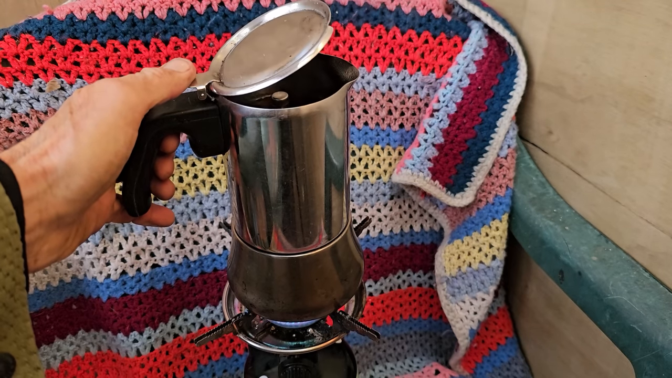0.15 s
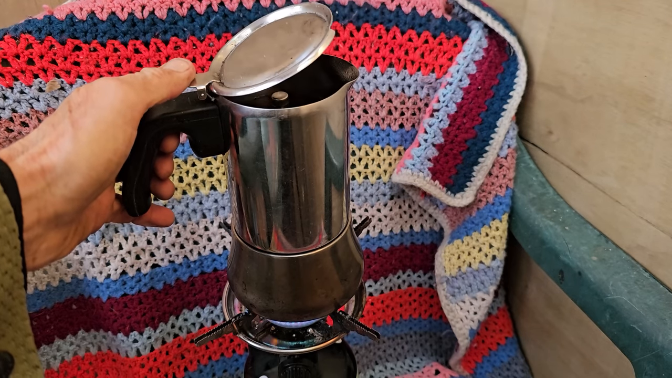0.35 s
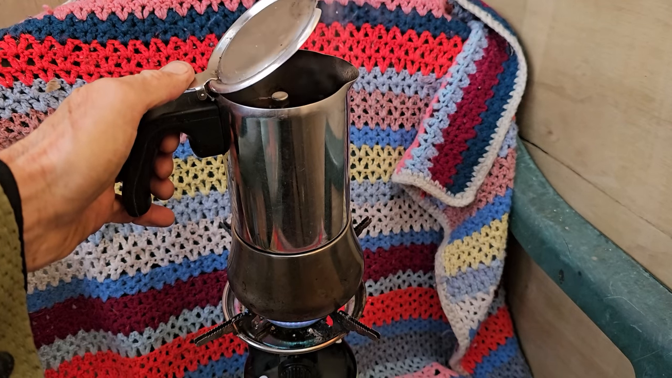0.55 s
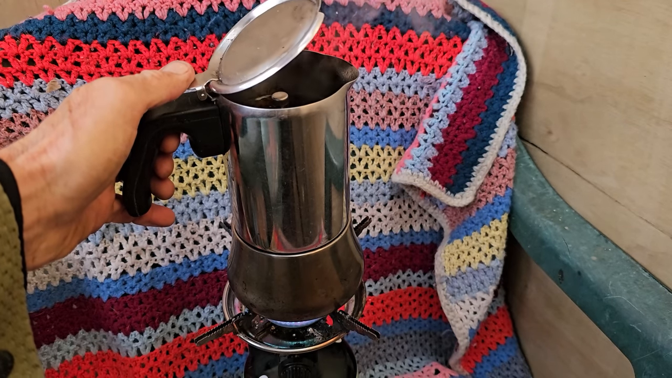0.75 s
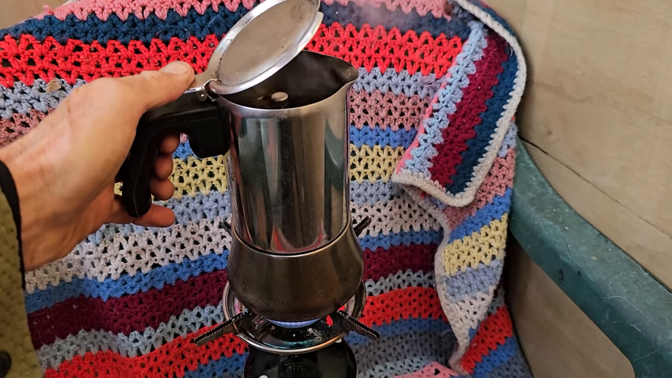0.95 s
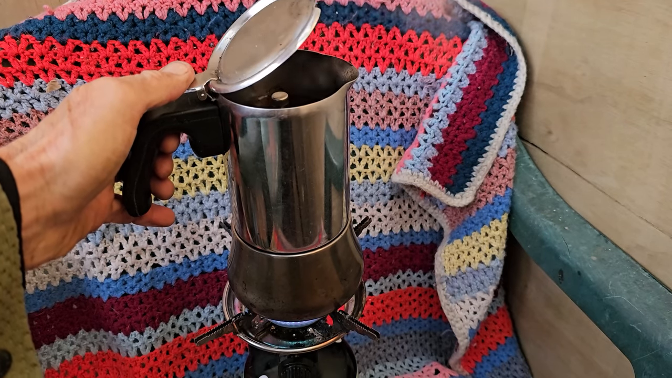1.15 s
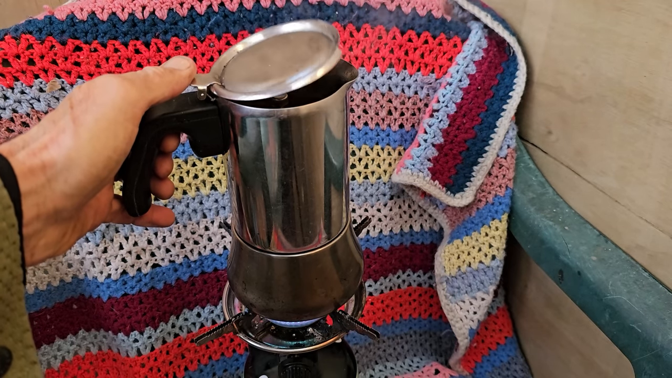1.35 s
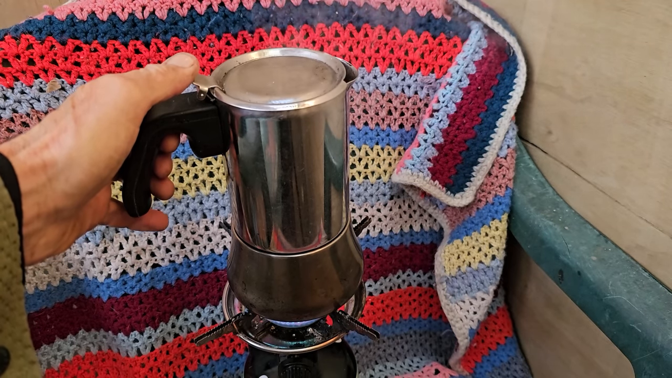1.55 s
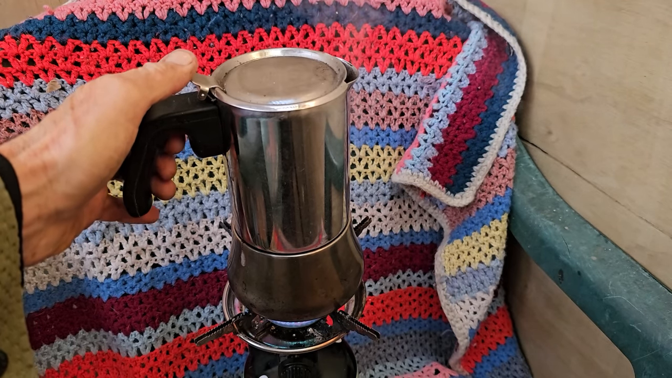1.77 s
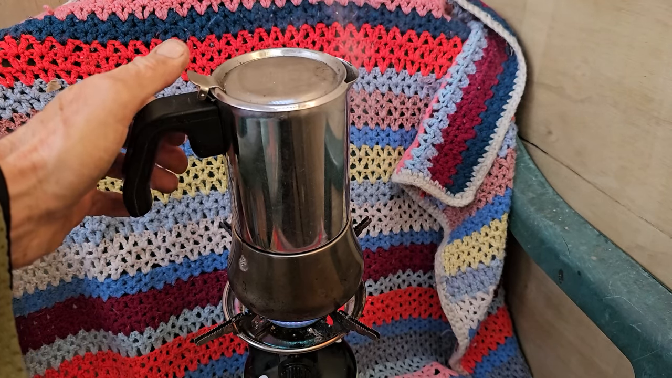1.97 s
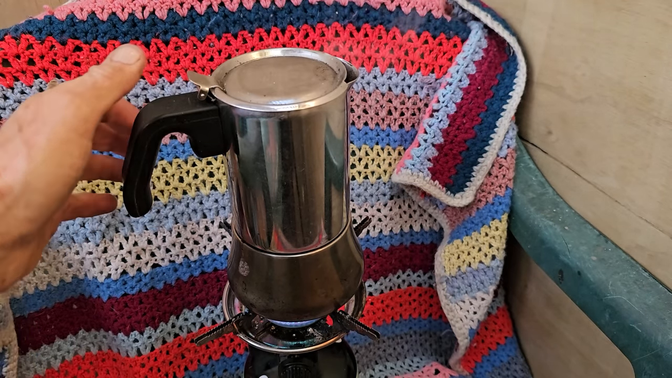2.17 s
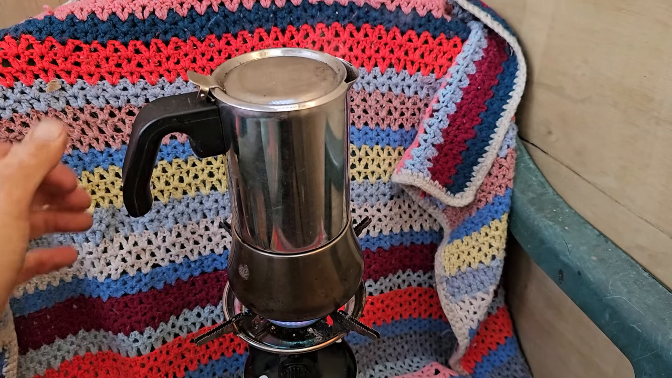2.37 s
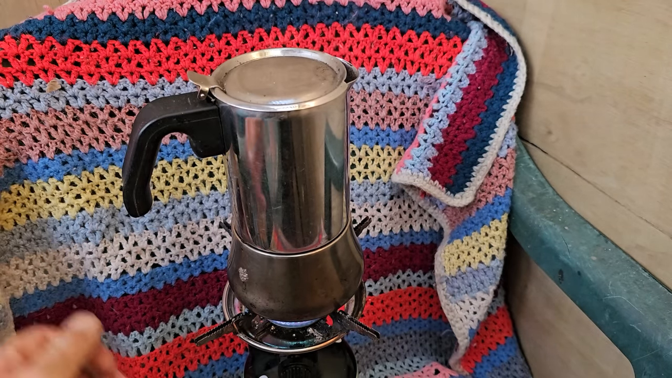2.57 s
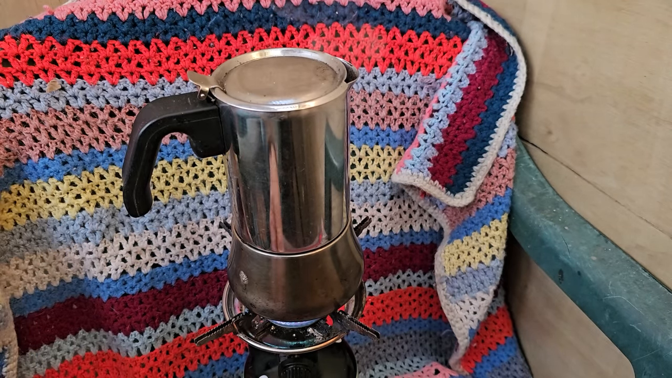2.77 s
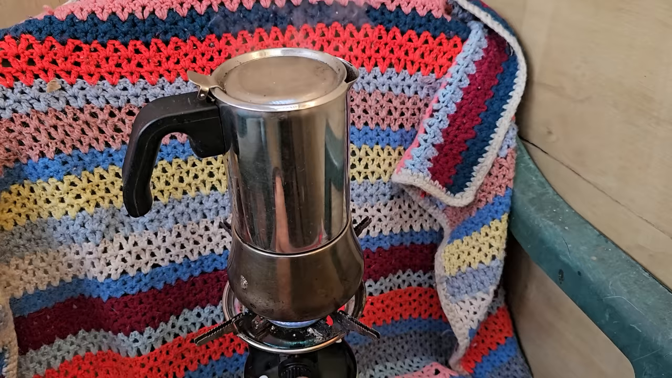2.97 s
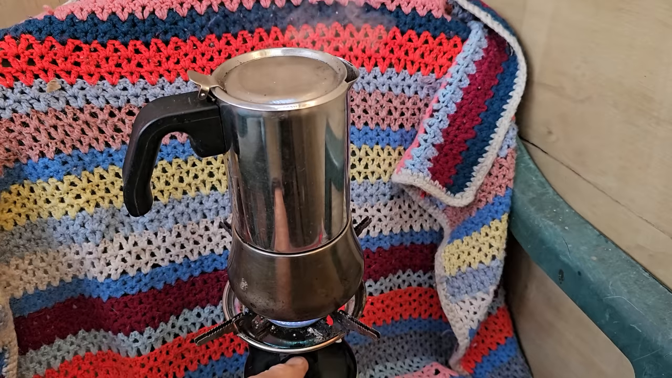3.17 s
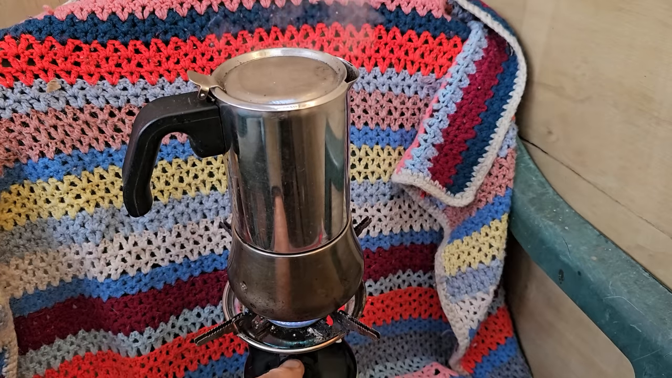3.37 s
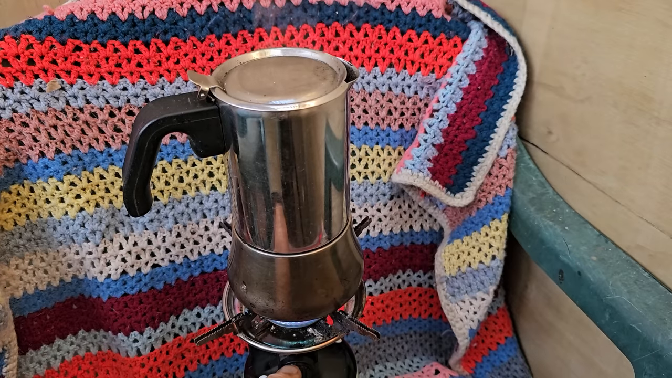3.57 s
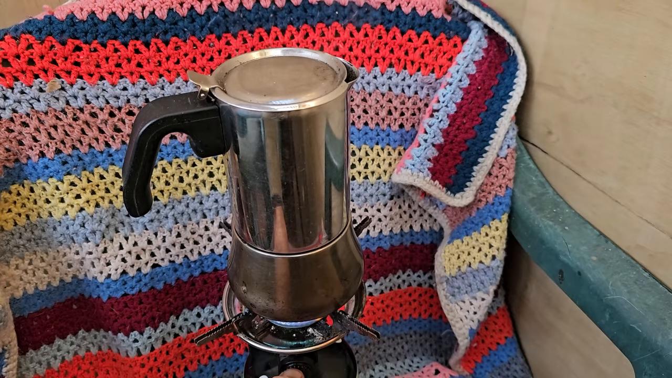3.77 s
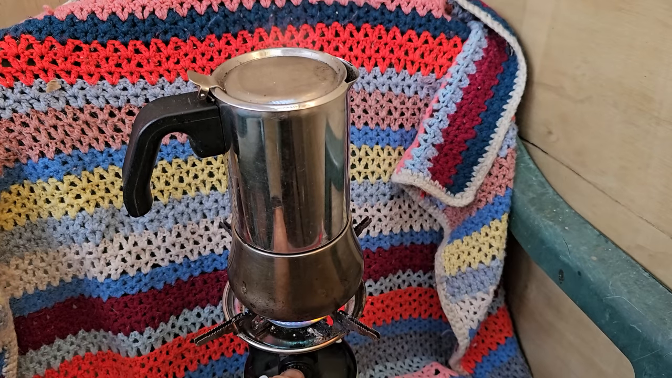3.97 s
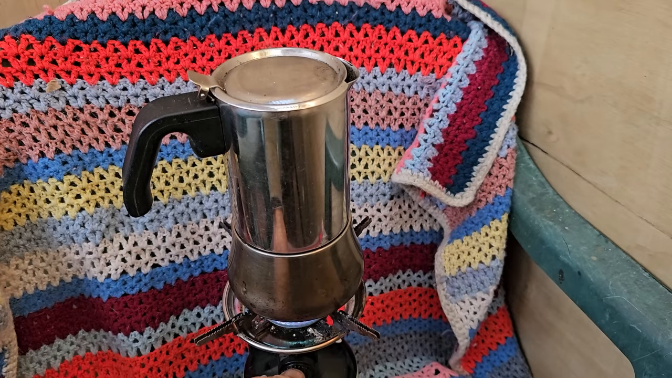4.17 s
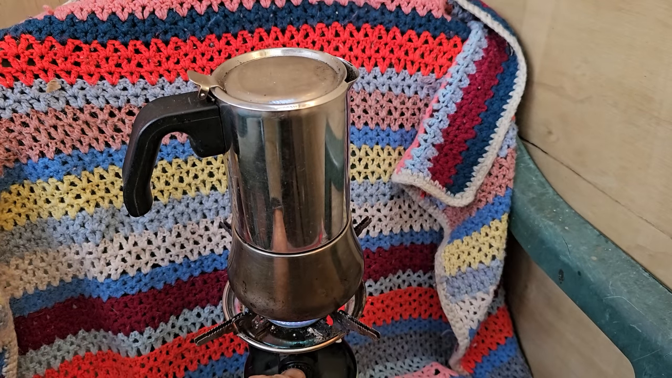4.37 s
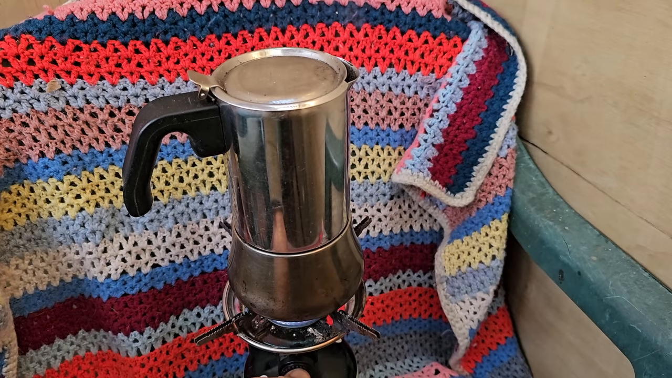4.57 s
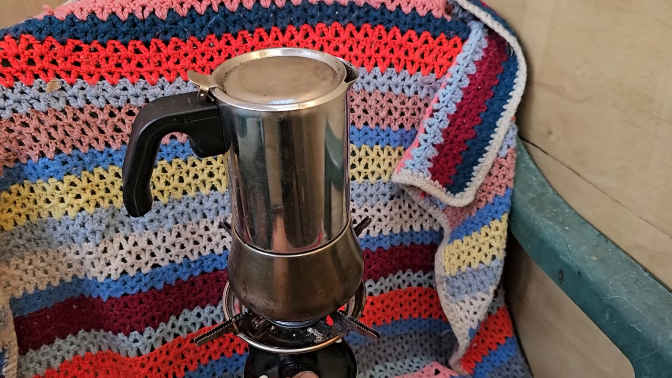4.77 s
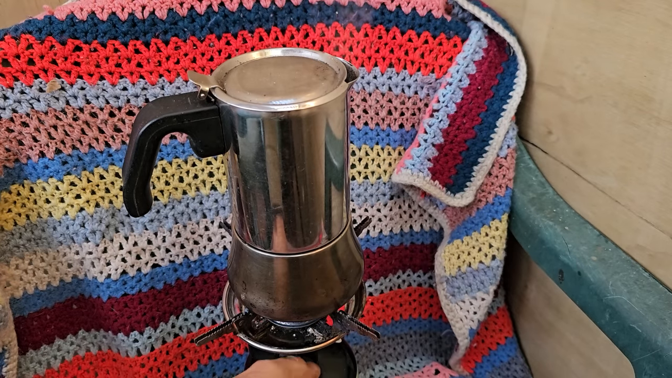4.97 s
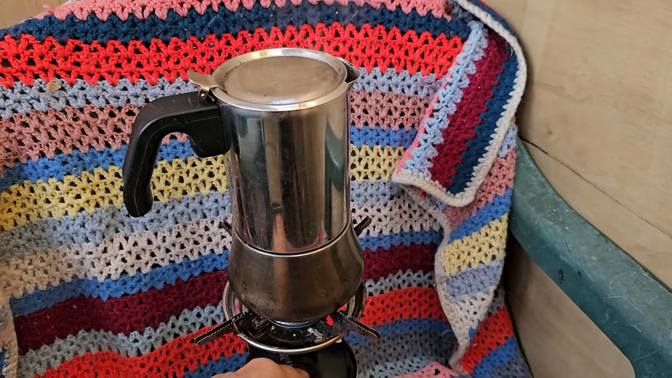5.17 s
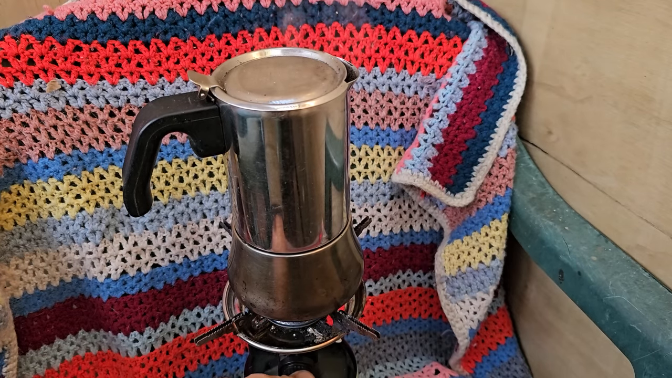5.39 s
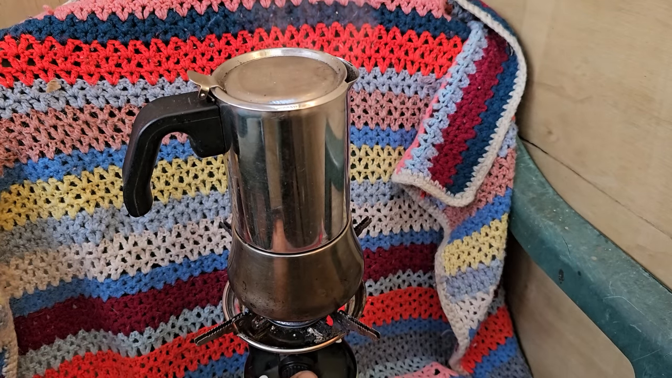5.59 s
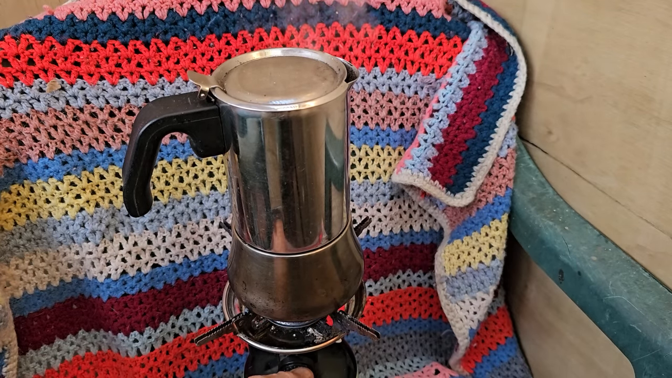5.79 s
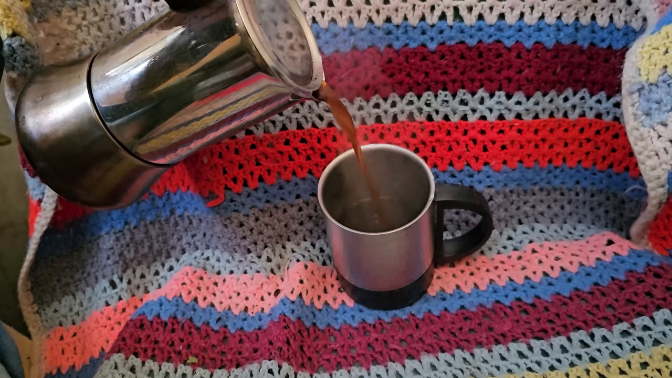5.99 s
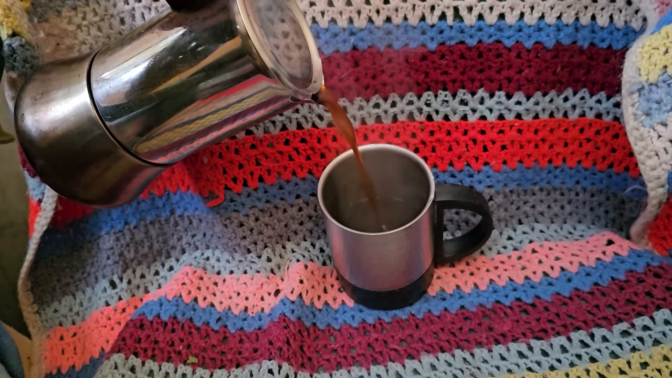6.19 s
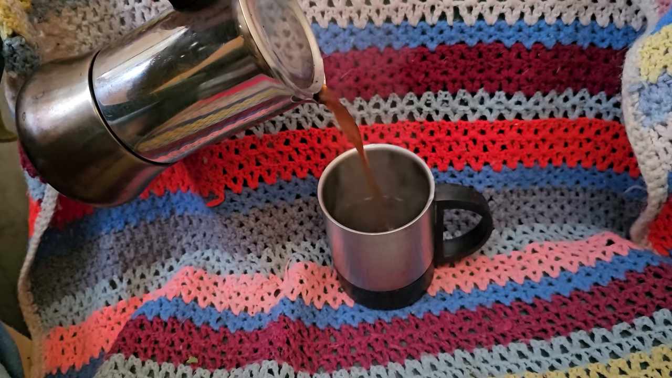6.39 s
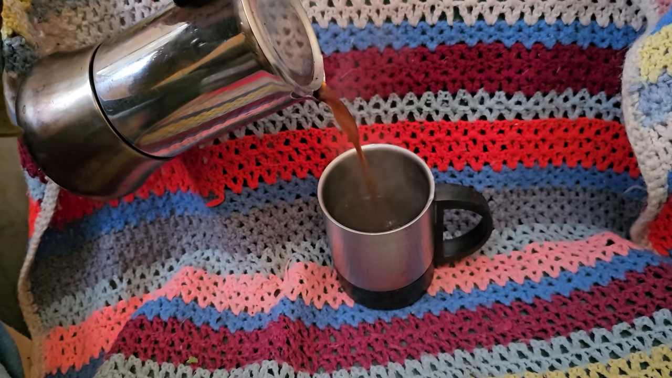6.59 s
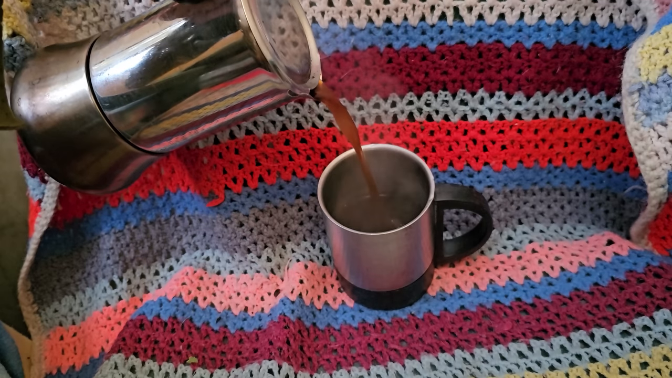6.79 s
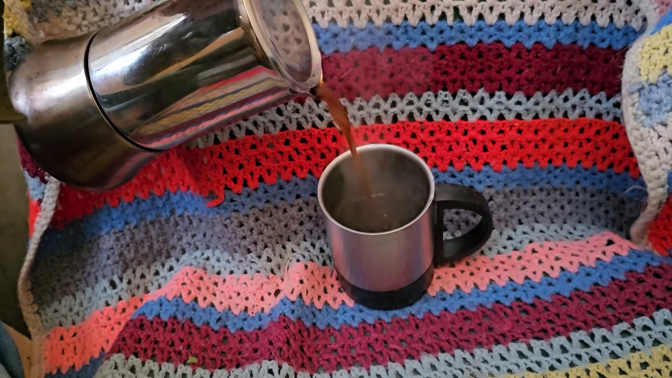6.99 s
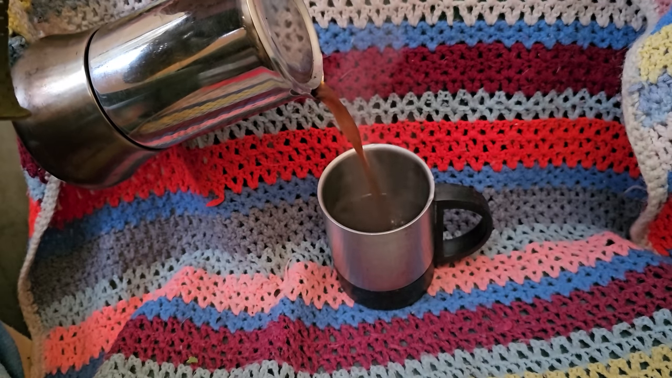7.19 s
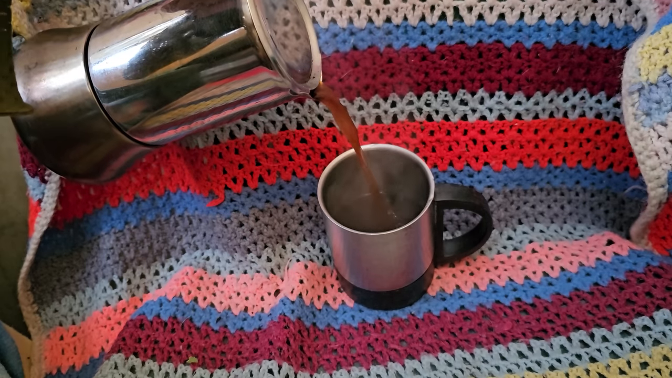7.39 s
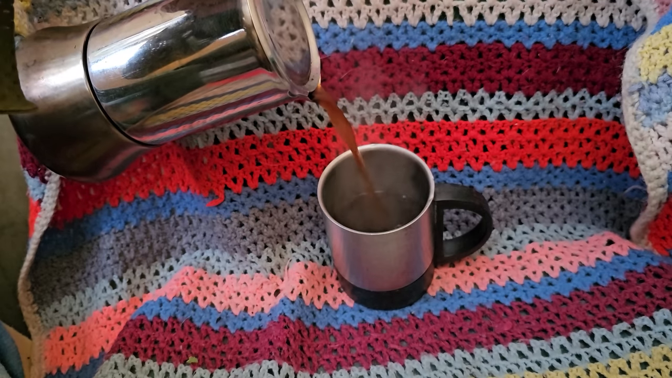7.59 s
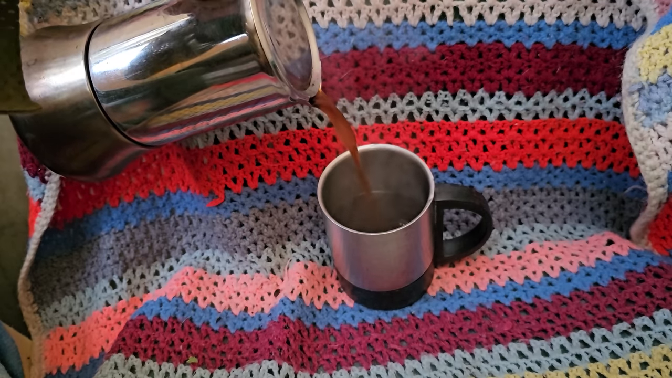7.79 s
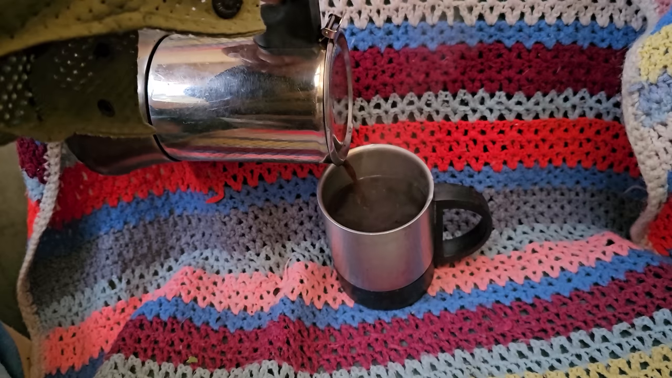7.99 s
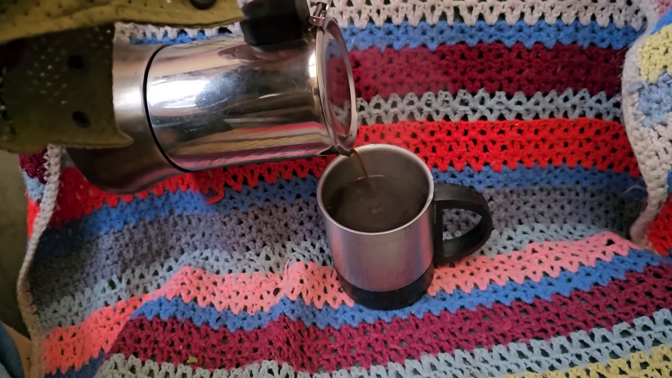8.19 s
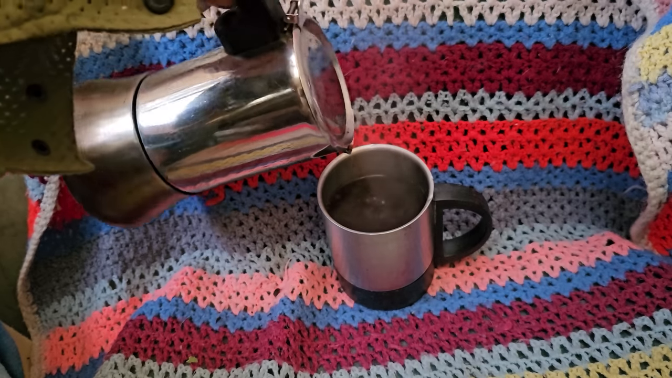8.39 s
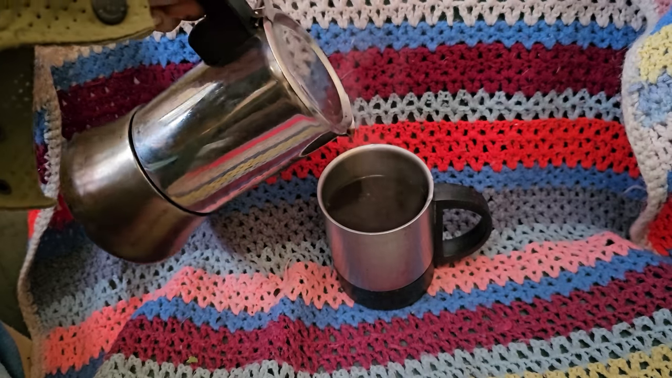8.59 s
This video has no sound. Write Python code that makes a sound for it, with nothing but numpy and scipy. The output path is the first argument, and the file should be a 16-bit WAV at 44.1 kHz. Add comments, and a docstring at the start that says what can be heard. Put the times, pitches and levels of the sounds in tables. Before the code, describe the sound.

A metal stovetop coffee pot gurgles over a hissing gas flame, its lid clacks shut, then coffee trickles into a metal mug.

```python
"""Moka pot and pouring coffee

A steel moka pot finishes brewing on a small gas burner: bursting bubbles excite the resonances of its chamber,
over filtered turbulent noise for the flame's roar and the hiss of steam.
The raised lid drops shut with a clatter of decaying steel modes, and later the gas is turned down.
Then, with the burner silent, a thin stream of coffee runs into a metal mug, which rings under clicks
and sine-like trapped bubbles, and ends in a few drips and a faint hiss."""
import sys
import numpy as np
from scipy import signal
from scipy.fft import rfft, irfft, next_fast_len
from scipy.io import wavfile
from scipy.ndimage import uniform_filter1d

SR = 44100
rng = np.random.default_rng(int(sys.argv[2]) if len(sys.argv) > 2 else 0)


def wav_record(signal):
    """Record a signal, one row per channel, as 16-bit PCM in the file named by sys.argv[1]."""
    frames = np.transpose(np.atleast_2d(signal))
    bounded = np.clip(frames, -1, 1)
    # unit amplitude maps onto the largest positive 16-bit level
    quanta = np.round(bounded * 32767).astype(np.int16)
    wavfile.write(sys.argv[1], SR, quanta)


N = 381465
TIME = np.arange(N) / SR
SIZE = 8192  # samples in an impulse response or a short sound
BREW_END = 5.998  # s, when the pot gives way to the pouring

# the burner, levels before each layer's own gain: time_s, flame_db, jet_db
GAS_FLOW = [(0, -47.5, -53.5), (1.5, -46.5, -56), (3, -48, -55.5), (4.58, -47.5, -56.5), (4.72, -57, -66.5),
            (6, -63, -80)]
# surges of the stream: start_s, hum_db
STREAM_SURGES = [(6.109, -55), (6.606, -44.5), (7.092, -57)]


def gurgle():
    """Impulsive excitation of a cavity: each burst knocks the air in the pot, and the closed lid makes it ring hollow."""
    # big bubbles bursting, levels before the room gain: start_s, level_db
    big_bursts = [(0.02, -28), (0.13, -31), (0.139, -27), (0.35, -34.5), (0.476, -31), (0.613, -26.5),
                  (0.99, -29.5), (1.167, -34), (1.233, -31.5), (1.348, -25), (1.452, -22.5), (1.473, -21),
                  (1.519, -22), (1.555, -24), (1.658, -24.5), (1.815, -26), (1.951, -31.5), (2.016, -22),
                  (2.119, -17), (2.27, -22.5), (2.307, -24), (2.444, -18.5), (2.458, -23.5), (2.607, -19.5),
                  (2.672, -26), (2.768, -23.5), (2.904, -26), (2.935, -24), (3.025, -16.5), (3.595, -20.5),
                  (4.094, -26.5), (4.195, -25), (4.373, -24.5), (4.491, -24), (4.721, -20.5),
                  (4.804, -27.5), (4.946, -27), (4.96, -26), (5.092, -23.5), (5.141, -30), (5.237, -22.5),
                  (5.339, -27.5), (5.391, -31.5), (5.502, -35), (5.561, -23.5), (5.578, -22),
                  (5.759, -22.5), (5.827, -33), (5.935, -27.5), (5.941, -26)]
    # spectrum of a burst with the lid up: frequency_hz, level_db
    open_colour = [(60, -28), (130, -13.5), (260, -2), (370, -11.5), (450, -2.5), (650, -1), (1050, -3.5),
                   (1350, -3), (1700, -5), (2200, -17.5), (3000, -22.5), (6000, -45), (15000, -45.5)]
    # spectrum of a burst with the lid down: frequency_hz, level_db
    shut_colour = [(60, -30), (130, -4.5), (250, 2.5), (365, -20), (480, -7.5), (590, 2.5), (850, -1),
                   (1100, 2), (1300, -6.5), (1650, -9.5), (2100, -18), (3000, -30), (6000, -49),
                   (15000, -64)]
    # air resonances of the closed chamber: frequency_hz, width_hz, lift_db
    chamber_modes = [(410.7, 31, 17.5), (533, 25, 7), (727, 17, -1.5), (773.4, 27, 7.5), (1028, 130, 9.5)]
    lid_shut = 1.45  # s
    note_hz, note_width_hz, note_scatter_oct = 1040, 240, .06
    open_tilt, shut_tilt, tilt_scatter = 1.6, 0.5, 1.86  # brightness, dB per octave
    small_count, small_db, small_scatter_db = 20, -35.5, 1.5  # weaker bubbles in between

    pops = np.zeros(N)
    tearing = 1 - 0.55 * np.exp(-np.arange(SIZE) / SR / 0.0012)  # the film takes a moment to tear
    small_levels = rng.normal(small_db, small_scatter_db, small_count)
    small_bursts = zip(scattered(0, BREW_END, count=small_count), small_levels)
    for s, db in [*small_bursts, *big_bursts]:
        if s < lid_shut:
            spectrum, peaks, tilt = open_colour, [], open_tilt
        else:
            spectrum, peaks, tilt = shut_colour, chamber_modes, shut_tilt
        pitch, sharpness = rng.standard_normal(2)
        note = (note_hz * 2 ** (note_scatter_oct * pitch), note_width_hz, 0)
        pot = response(spectrum, [*peaks, note], tilt + tilt_scatter * sharpness)
        add(pops, s, amp(db) * topped(pot * tearing))
    pops = signal.sosfilt(signal.butter(2, 3400, fs=SR, output="sos"), pops)  # the liquid muffles the treble

    froth = clicks(per_s=700, spread_db=2.5)  # tiny bubbles simmer between
    lid_up = evened(colour(froth, response(open_colour)))
    lid_down = evened(colour(froth, response(shut_colour, chamber_modes)))
    simmer = np.where(TIME < lid_shut, amp(-3.0) * lid_up, lid_down)
    simmer = simmer * amp(-51) * boil(follows=0.2, stirred=0.59)

    open_pops, shut_pops = pops * (TIME < lid_shut), pops * (TIME >= lid_shut)
    wet_pops = amp(-4) * room(open_pops, wet_db=-1) + amp(-3.5) * room(shut_pops, wet_db=-9.0)
    return wet_pops + room(simmer, wet_db=-5.5)


def boil(follows, stirred):
    """Heat input drives vapour output: the boil sinks with the flame and swells with each puff of steam.

    follows: dB lost per dB less of flame; stirred: dB gained per dB of puff."""
    # puffs of steam, each a Gaussian swell: peak_s, half_width_s, lift_db
    steam_puffs = [(1.279, 0.16, 7.5), (3.303, 0.31, 2), (4.326, 0.13, 7.5), (5.671, 0.051, 12)]
    flame = level(GAS_FLOW) / level(GAS_FLOW)[0]
    puff_db = sum(db * np.exp(-((TIME - s) / width) ** 2) for s, width, db in steam_puffs)
    return flame ** follows * amp(stirred * puff_db)


def lid():
    """Impact and modal decay: a crack at each contact of the bouncing lid, and the steel rings."""
    # contacts with the rim, levels before the seating and room: start_s, crack_db, ring_db
    rim_hits = [(1.4504, -29.5, -24), (1.4531, -17, -17), (1.5205, -26.5, -71), (1.5239, -24, -26),
                (1.5564, -23, -23.5)]
    # ringing modes of the lid: frequency_hz, level_db, t60_s
    steel_modes = [(1987, -14.5, 0.15), (2860, -25.5, 0.068), (3397, -6.5, 0.39), (3795, -23, .11),
                   (4100, -24.5, .11), (4600, -21, .1), (5340, -12.5, .09), (5496, -0.5, 0.26),
                   (5665, -3.5, 0.24), (7350, -7, 0.22), (7706, -16.5, 0.11), (8650, -1.5, 0.14),
                   (8725, -5.5, 0.11), (10070, -12.5, .08), (10910, -16.5, .07), (11880, -13.5, 0.073),
                   (13300, 0, 0.083), (13440, -4.5, .07)]
    # spectrum of a contact: frequency_hz, level_db
    crack_colour = [(200, -10), (1000, 4.5), (2000, -1), (2700, -5), (5000, -4), (8800, -8), (10500, 0),
                    (13200, 6), (16000, -16)]
    t, cracks, rings = np.arange(SR // 2) / SR, np.zeros(N), np.zeros(N)
    partials = [amp(db) * dying(t, t60) * np.sin(2 * np.pi * hz * t) for hz, db, t60 in steel_modes]
    ring = topped(sum(partials))
    for s, crack_db, ring_db in rim_hits:
        decay = dying(t, t60=0.006) + amp(-14.0) * dying(t, t60=.12)
        contact = rng.standard_normal(len(t)) * decay
        add(cracks, s, amp(crack_db) * topped(colour(contact, response(crack_colour))))
        add(rings, s, amp(ring_db) * ring)
    seated = amp(np.interp(TIME, [1.585, 1.61], [0, -9]))  # at rest, the rim damps the lid
    return room(cracks, wet_db=-4) + seated * rings


def pour():
    """Liquid impact and bubble entrainment: each splash knocks the mug, traps bubbles and throws spray."""
    # big splashes, levels before the shares below: start_s, impact_db, pitch_hz, bubble_db
    big_splashes = [(6.0242, -44.5, 3170, -52), (6.1078, -35, 1270, -50), (6.1549, -43, 3240, -48),
                    (6.1901, -38.5, 1800, -49), (6.2812, -49, 1320, -45.5), (6.2902, -48, 1260, -45),
                    (6.3265, -48, 3350, -51), (6.412, -43.5, 1250, -58), (6.593, -37, 3200, -50),
                    (6.6065, -45, 1250, -28), (6.6172, -37, 1240, -43), (6.632, -31.5, 1860, -44),
                    (6.7013, -37, 1300, -42.5), (6.7414, -40, 1280, -51), (6.771, -38.5, 1170, -51),
                    (6.7976, -48, 1270, -50), (7.0392, -43.5, 1900, -49), (7.052, -41, 1720, -48),
                    (7.0931, -31, 1260, -51), (7.1561, -32.5, 1250, -44), (7.1885, -53, 1220, -46),
                    (7.3655, -51, 1920, -52)]
    # spectrum of a splash: frequency_hz, level_db
    splash_colour = [(100, -35), (260, -9), (400, -13), (700, -10), (1300, -2.5), (1900, -3.5), (2600, -24),
                     (3400, -11), (4500, -14.5), (8000, -24.5), (16000, -49)]
    # spectrum of the spray and fizz: frequency_hz, level_db
    spray_colour = [(1000, -39), (3000, -0.5), (5000, -1.5), (8000, 0), (12000, 5.5), (16000, -0.5)]
    # ringing of the mug: frequency_hz, width_hz, lift_db
    mug_modes = [(264.4, 8.5, 22), (696, 98, 13.5), (1250, 98, 13.5), (3250, 105, 15)]
    # the running stream, levels before each layer's own gain: time_s, trickle_db, fizz_db
    stream_flow = [(6.0, -68.5, -72.5), (6.4, -74, -76.5), (6.98, -72.5, -72.5), (7.15, -73, -76.5),
                   (7.58, -77.5, -77), (8.6, -78, -96)]
    knock_db, spray_db = -17.5, -13  # shares of an impact that go into the mug and into spray

    body, mist, bubbles = np.zeros(N), np.zeros(N), np.zeros(N)
    mug, flow = response(splash_colour, mug_modes), level(stream_flow) * churn()
    for s, impact_db, hz, bubble_db in big_splashes:
        add(body, s, amp(impact_db + knock_db) * topped(mug))
        add(bubbles, s, amp(bubble_db - 6.5) * plop(hz))
        add(mist, s, amp(impact_db + spray_db) * spray(spray_colour, t60=0.026))
    trickle = evened(colour(clicks(per_s=210, spread_db=5.5), mug))
    trickle = amp(-5.5) * flow * trickle
    fizz = evened(colour(clicks(per_s=1200, spread_db=6), response(spray_colour)))
    fizz = amp(2.5) * level(stream_flow, axis=2) * fizz

    knocks = room(body + trickle, wet_db=2.0)
    ringing = room(bubbles + blips(flow), wet_db=-6)
    return knocks + ringing + room(mist + fizz, wet_db=-4.5) + gulps()


def churn():
    """Relaxation of stirred liquid: the trickle's gain jumps at each surge and settles exponentially."""
    lift_db, settle_s = 6, 0.22  # settle_s is the time constant
    stir = sum((TIME >= s) * np.exp(-abs(TIME - s) / settle_s) for s, _ in STREAM_SURGES)
    return amp(lift_db * stir)


def plop(hz):
    """Bubble resonance: one main bubble, with four smaller ones of scattered pitch close behind it."""
    out = bubble(hz, t60=.016, onset=.001)
    for when, pitch, size in rng.random((4, 3)):
        small = bubble(1200 * 2 ** (1.6 * pitch), t60=0.0091, onset=0.0013)
        add(out, 0.011 * when, amp(-5.5 - 10 * size) * small)
    return topped(out)


def blips(flow):
    """Bubble entrainment: small bubbles trapped by the stream, louder where it churns."""
    count, length_s = 55, 1.6
    level_db, scatter_db = 11.5, 3.5  # over the flow's gain
    centres_hz, scatter_oct = [1260, 1830, 3290], 0.084  # the pitches around which they gather
    out = np.zeros(N)
    for s in scattered(BREW_END, length_s, count=count):
        pitch, size = rng.standard_normal(2)
        hz = rng.choice(centres_hz) * 2 ** (scatter_oct * pitch)
        add(out, s, amp(level_db + scatter_db * size) * bubble(hz, t60=0.021, onset=.0006))
    return out * flow


def gulps():
    """Resonant excitation: a surge of the stream sets the whole mug humming for a moment."""
    mug_hz = 251
    t, out = np.arange(SR // 2) / SR, np.zeros(N)
    hum = (1 - np.exp(-t / 0.016)) * dying(t, t60=0.63) * np.sin(2 * np.pi * mug_hz * t)
    for s, db in STREAM_SURGES:
        add(out, s, amp(db) * hum)
    return out


def drips():
    """Bubble resonance after drop impact: the last drips plink singly in the mug; a faint narrow hiss follows."""
    # single drips: start_s, bubble_db, pitch_hz, t60_s, spray_db
    last_drips = [(8.045, -35, 537, 0.14, -85), (8.063, -57, 2090, 0.041, -75.5),
                  (8.224, -58, 2270, 0.016, -66), (8.2625, -32.5, 1950, 0.013, -46),
                  (8.279, -41, 1850, 0.036, -60), (8.2995, -19, 2015, 0.0094, -56),
                  (8.388, -85, 3900, 0.018, -61)]
    # spectrum of their spray: frequency_hz, level_db
    drip_colour = [(1200, -32), (2200, 3), (4000, -1), (5200, -13), (7000, 4.5), (9500, -12), (13000, -2),
                   (16000, -16)]
    # the hiss at the end: time_s, level_db
    end_hiss = [(8.2, -93.5), (8.42, -91), (8.5, -78.5), (8.65, -78)]
    # its spectrum: frequency_hz, level_db
    hiss_colour = [(1000, 8), (2800, -43), (3900, 12), (4600, 1), (5600, -30), (16000, -52)]
    out = np.zeros(N)
    for s, db, hz, t60, spray_db in last_drips:
        onset = 0.0022 * (1000 / hz) ** 1.43  # s; deeper bubbles take longer to swell
        add(out, s, amp(db) * bubble(hz, t60, onset) + amp(spray_db) * spray(drip_colour, t60=0.016))
    return room(out, wet_db=-13.5) + level(end_hiss) * rush(hiss_colour)


def bubble(hz, t60, onset):
    """Volume oscillation of a trapped bubble: a brief ring whose pitch rises a little as it nears the surface."""
    t = np.arange(SIZE) / SR
    turns = hz * np.cumsum(1 + 0.033 * np.minimum(t / t60, 1)) / SR
    return (1 - np.exp(-(t / onset) ** 2)) * dying(t, t60) * np.sin(2 * np.pi * turns)


def spray(spectrum, t60):
    """Decaying noise burst: a tick of fine droplets, the largest of which gives it a pitch of its own."""
    mist = rng.standard_normal(SIZE) * dying(np.arange(SIZE) / SR, t60)
    droplet = (5000 * 2 ** (1.13 * rng.random()), 900, 10)
    return topped(colour(mist, response(spectrum, [droplet])))


def steam():
    """Turbulent jet noise: steam whistles faintly through the column, and spills out while the lid is up."""
    # spectrum of steam in the column: frequency_hz, level_db
    column_colour = [(500, -43.5), (2000, -13), (3400, -6.5), (4300, -24.5), (6200, -23.5), (7500, -13),
                     (9000, -16), (10800, -18), (12500, -12), (14000, -20), (16000, -20.5)]
    # its whistling resonances: frequency_hz, width_hz, lift_db
    column_peaks = [(3585, 140, 14.5), (5400, 80, 9.5), (7460, 170, 9.5), (9400, 260, 5)]
    # steam escaping under the raised lid, before its flutter: time_s, level_db
    vent_flow = [(0, -63), (.3, -53.5), (.55, -52), (1.0, -52), (1.4, -49), (1.46, -67), (1.6, -100)]
    # its spectrum: frequency_hz, level_db
    vent_colour = [(400, -20.5), (900, -2), (1600, 0), (2400, -9), (4500, -10), (6600, -11), (10000, -21),
                   (13000, -14), (16000, -25.5)]
    # its resonance: frequency_hz, width_hz, lift_db
    vent_peaks = [(6650, 170, 13)]
    strength = amp(-60.5) * boil(follows=0.25, stirred=0.89)
    column = strength * rush(column_colour, column_peaks) * waver(rate_hz=19, depth_db=3.5)
    vent = level(vent_flow) * rush(vent_colour, vent_peaks) * waver(rate_hz=30, depth_db=2.0)
    return column + vent


def burner():
    """Combustion and jet noise: a fluttering flame over the even hiss of the gas jet."""
    # spectrum of the flame: frequency_hz, level_db
    flame_colour = [(50, -24), (100, -17.5), (135, -4.5), (175, -10), (230, -1.5), (290, -1.5), (360, -12),
                    (450, -20.5), (800, -20), (2000, -34)]
    # resonances of the flame: frequency_hz, width_hz, lift_db
    flame_peaks = [(136, 14, 11.5), (268.2, 8.9, 5)]
    # spectrum of the gas jet: frequency_hz, level_db
    jet_colour = [(600, -13), (1800, 10.5), (2500, -6), (3400, 8.5), (4600, -4), (5400, -0.5), (6300, -9.5),
                  (7400, 1.5), (8400, -0.5), (10700, -13.5), (12000, -0.5), (14000, -19), (16000, -11)]
    # resonances of the gas jet: frequency_hz, width_hz, lift_db
    jet_peaks = [(3740, 420, -2), (5450, 100, 8), (7470, 100, 6.5), (8350, 250, -2)]
    flame = amp(2.0) * level(GAS_FLOW) * rush(flame_colour, flame_peaks)
    jet = amp(3.5) * level(GAS_FLOW, axis=2) * rush(jet_colour, jet_peaks)
    return flame * waver(rate_hz=13, depth_db=0.7) + jet


def rumble():
    """Low-frequency filtered noise: a brief dull rumble while the hand still holds the pot."""
    # its course: time_s, level_db
    rumble_course = [(1.44, -80.5), (1.48, -48), (1.58, -49), (1.68, -45), (1.78, -58), (1.9, -80)]
    # its spectrum: frequency_hz, level_db
    rumble_colour = [(20, -21.5), (45, -5), (62, -0.5), (85, 3.5), (120, -17.5), (400, -52)]
    return level(rumble_course) * rush(rumble_colour)


def sleeve():
    """Friction noise: short dry swishes of cloth as a sleeve brushes past."""
    # swishes: start_s, level_db, t60_s
    swishes = [(2.560, -40.5, 0.26), (2.635, -38.5, 0.2)]
    # spectrum of the cloth: frequency_hz, level_db
    cloth_colour = [(800, -9), (2500, -2), (4500, 4), (7500, -9), (10000, -13.5), (16000, -23)]
    t, out = np.arange(SR // 4) / SR, np.zeros(N)
    for s, db, t60 in swishes:
        add(out, s, amp(db) * dying(t, t60))
    return out * rush(cloth_colour)


def room_noise():
    """Stationary background noise: a slowly wavering low hum under a steady, fainter wash of air."""
    # spectrum of the low noise: frequency_hz, level_db
    hum_colour = [(20, -15.5), (45, -7), (60, -3.5), (80, -3.5), (100, -11), (135, -21), (160, -17),
                  (200, -25.5), (300, -34.5), (500, -44.5), (1500, -70.5)]
    # spectrum of the air: frequency_hz, level_db
    air_colour = [(100, -21), (400, 2), (1200, -1.5), (2600, -10), (4200, -8.5), (6000, -23.5),
                  (16000, -20)]
    hum = amp(-57.5) * rush(hum_colour, [(82.3, 4.8, 6.4)]) * waver(rate_hz=14, depth_db=3.0)
    return hum + amp(-76.5) * rush(air_colour)


def room(x, wet_db):
    """Reverberation: direct sound, a few near echoes, and a short tail with a decay time for each frequency."""
    # reflections from near surfaces: delay_s, left_gain, right_gain
    near_echoes = [(.0029, 0.18, 0.089), (.0046, -0.031, 0.37), (.0088, .12, .08), (0.0139, 0.25, 0.061)]
    # decay of the tail: frequency_hz, t60_s
    tail_decay = [(100, 0.17), (500, 0.15), (2000, 0.17), (8000, 0.15), (16000, 0.057)]
    size = SR // 2
    taps = rng.standard_normal((2, size)) * (np.arange(size) > .005 * SR)
    hz, t, z = signal.stft(taps, SR, nperseg=256)
    decay = amp(-60 * t / read(tail_decay, hz)[:, None])
    tail = signal.istft(z * decay, SR, nperseg=256)[1]
    impulse = amp(wet_db) * tail / np.linalg.norm(tail[0])
    impulse[:, 0] += 1
    for s, left, right in near_echoes:
        impulse[:, round(s * SR)] += left, right
    return np.array([colour(x, side) for side in impulse])


def placed(x, aside):
    """Interchannel level and phase: a source aside leads in the left of two close microphones; bass is shared."""
    # left minus right at aside = 1, before the bass is shared: frequency_hz, level_db
    left_excess = [(200, -0.5), (400, 0), (700, 8), (1050, -0.5), (1300, 2), (2000, 0.5), (3400, 1),
                   (5500, 0.5), (8500, 1.5), (13000, -0.5)]
    # phase by which the left leads at aside = 1, likewise: frequency_hz, lead_rad
    left_lead = [(0, 0), (130, -0.27), (500, 1), (950, -0.1), (1380, 2), (2070, 1.95), (2840, 2), (3500, 4),
                 (5500, 5.5), (6630, 7.5), (7400, 9.5), (8600, 9.5), (10500, 11), (13100, 14),
                 (16000, 13.5)]
    size = next_fast_len(N + SIZE, True)
    hz = np.fft.rfftfreq(size, 1 / SR)
    toward_left = amp(read(left_excess, hz)) ** (aside / 2) * np.exp(.5j * aside * read(left_lead, hz))
    left, right = rfft(x, size) * np.array([toward_left, 1 / toward_left])
    mid = (left + right) / 2
    side = (left - right) / 2 * hz / np.hypot(hz, 350)
    return irfft(np.array([mid + side, mid - side]), size)[:, :N]


def rush(spectrum, peaks=()):
    """Partial coherence: turbulent noise at two microphones, partly alike, with an rms of one."""
    # left-right likeness: frequency_hz, coherence
    likeness = [(120, 0.99), (220, 0.98), (330, 0.91), (1000, 0.63), (2000, 0.89), (4000, 0.55),
                (16000, 0.19)]
    size = next_fast_len(N, True)
    hz = np.fft.rfftfreq(size, 1 / SR)
    a, b = rfft(rng.standard_normal((2, size))) * abs(rfft(response(spectrum, peaks), size))
    same = np.clip(read(likeness, hz), 0, 1)
    pair = np.array([a, same * a + np.sqrt(1 - same ** 2) * b])
    return evened(irfft(pair, size)[:, :N])


def response(spectrum, peaks=(), tilt_db=0):
    """Minimum-phase filtering: causal impulse response of a broad spectrum with resonances standing on it."""
    hz = np.fft.rfftfreq(SIZE, 1 / SR)
    lift = 1 + sum(amp(db) ** 2 / (1 + (2 * (hz - f) / width) ** 2) for f, width, db in peaks)
    octaves = np.log2(np.clip(hz, 200, 4000) / 1000)
    gain = amp(read(spectrum, hz) + tilt_db * octaves) * np.sqrt(lift)
    cepstrum = irfft(np.log(gain))
    causal = 2 * cepstrum * (np.arange(SIZE) < SIZE // 2)  # folding the cepstrum makes it causal
    return irfft(np.exp(rfft(causal)))


def colour(x, impulse):
    """Convolution: passes a sound through an impulse response."""
    return signal.oaconvolve(x, impulse)[:len(x)]


def waver(rate_hz, depth_db):
    """Random amplitude modulation: a gain that drifts, its depth being the rms in dB."""
    hz = np.fft.rfftfreq(N, 1 / SR)
    drift = irfft(rfft(rng.standard_normal(N)) * np.exp(-(hz / rate_hz) ** 2), N)
    return amp(depth_db * evened(drift))


def clicks(per_s, spread_db):
    """Poisson-like impulses: random clicks of either sign, most small and a few large."""
    sizes = amp(spread_db * np.minimum(rng.exponential(1, N), 4))
    return sizes * (rng.random(N) < per_s / SR) * rng.choice([-1, 1], N)


def scattered(start, length, count):
    """Stratified sampling: random moments, one in each equal share of a stretch of time."""
    return start + length * (np.arange(count) + rng.random(count)) / count


def dying(t, t60):
    """Exponential decay: 60 dB lost in t60 seconds."""
    return np.exp(-np.log(1000) * t / t60)


def amp(db):
    """Logarithmic level: decibels to gain."""
    return 10 ** (np.asarray(db) / 20)


def evened(x):
    """Mean power: scales to an rms of one."""
    return x / np.sqrt(np.mean(x ** 2) + 1e-20)


def topped(x):
    """Short-time power: scales so that the loudest 4 ms have an rms of one."""
    return x / np.sqrt(uniform_filter1d(x ** 2, size=176, mode="constant").max() + 1e-20)


def read(points, hz):
    """Log-frequency interpolation: joins the points of a spectrum."""
    f, value = np.transpose(points)
    return np.interp(np.log(hz + 1), np.log(f + 1), value)


def level(rows, axis=1):
    """Envelope: one dB column of a curve as a gain for every sample."""
    rows = np.asarray(rows)
    return amp(np.interp(TIME, rows[:, 0], rows[:, axis]))


def add(mix, s, sound):
    """Superposition: adds a sound into the mix at time s."""
    part = mix[max(round(s * SR), 0):][:len(sound)]
    part += sound[:len(part)]


def scene():
    """Superposition of sources: first the pot on the flame, then the pouring, over the low noise of the room."""
    brewing = np.clip((BREW_END - TIME) / .004, 0, 1)
    pot = placed(gurgle() + steam() + burner() + lid() + rumble() + sleeve(), aside=0.8)
    mug = placed(pour() + drips(), aside=0.16)
    return brewing * pot + (1 - brewing) * mug + room_noise()


def record(dry):
    """Linear-phase low-pass filtering: the recorder's band limit."""
    edge_hz = 15850
    lowpass = signal.firwin(511, edge_hz, window=("kaiser", 9), fs=SR)
    return signal.oaconvolve(dry, lowpass[None], "same")


dry = scene()
out = record(dry)
wav_record(out)
```